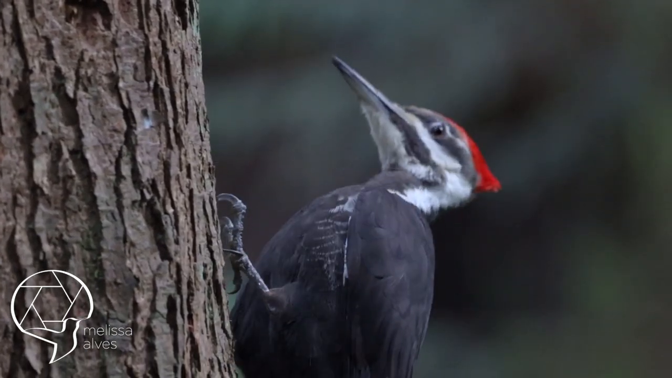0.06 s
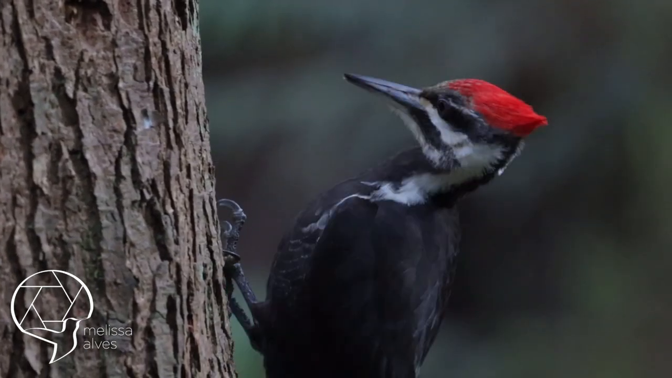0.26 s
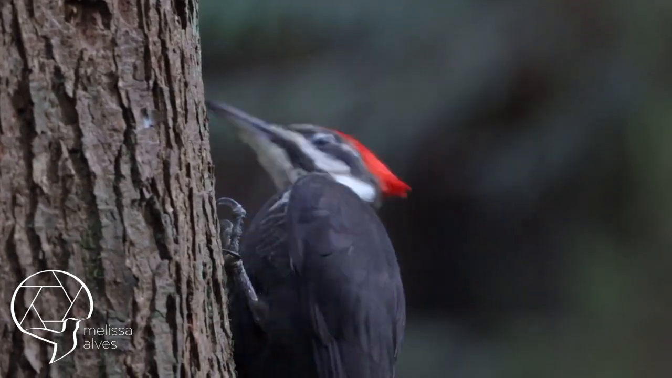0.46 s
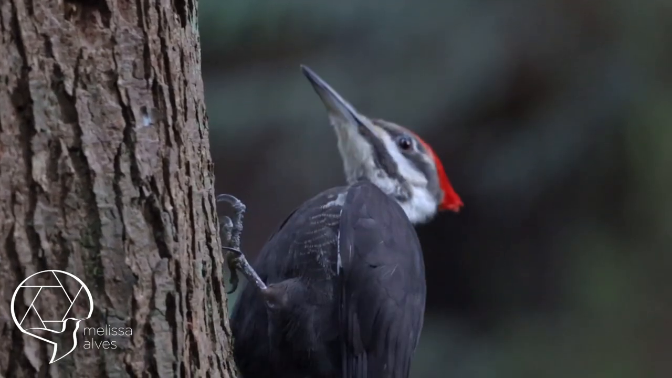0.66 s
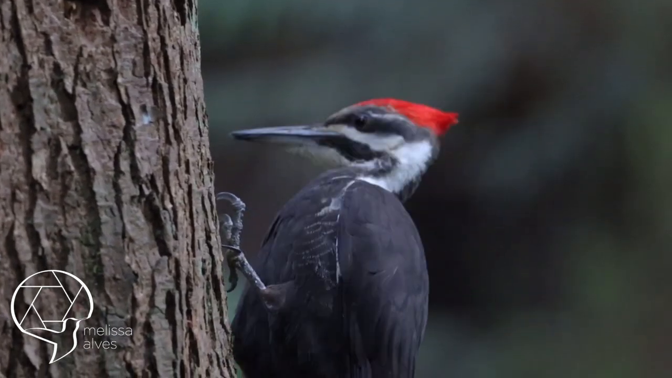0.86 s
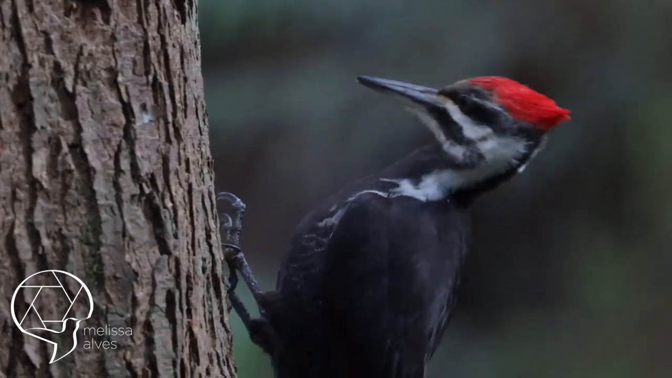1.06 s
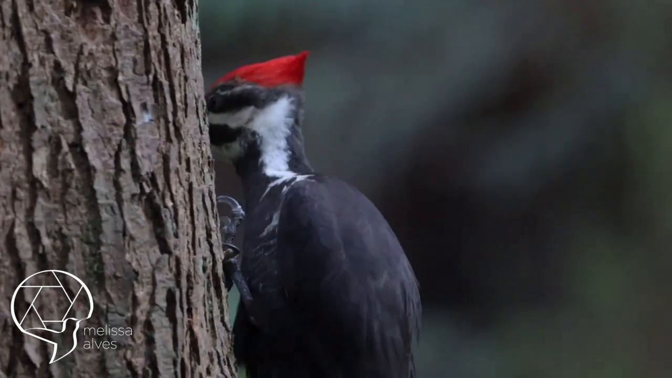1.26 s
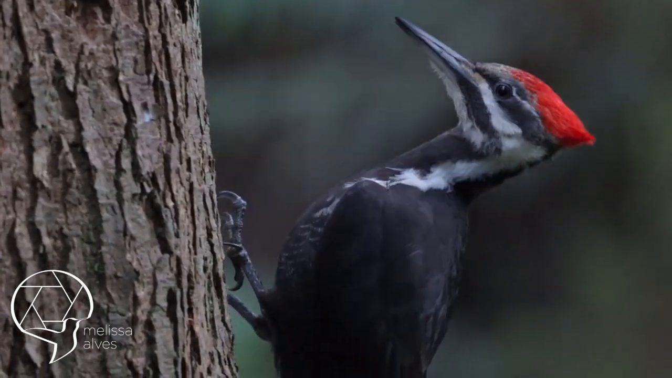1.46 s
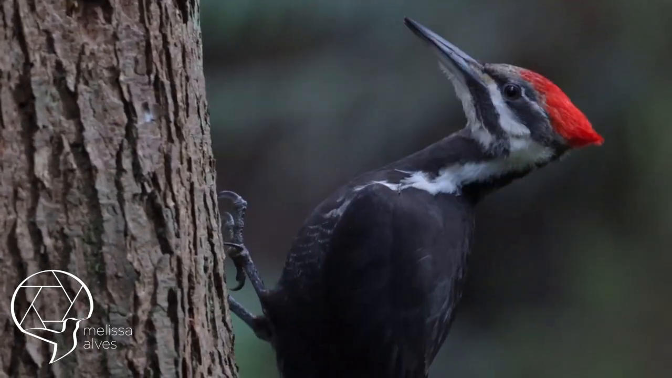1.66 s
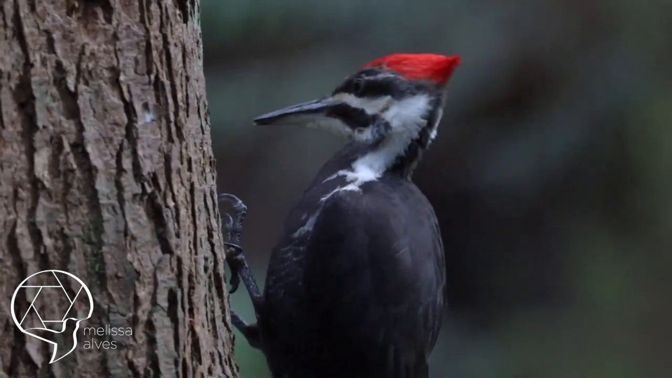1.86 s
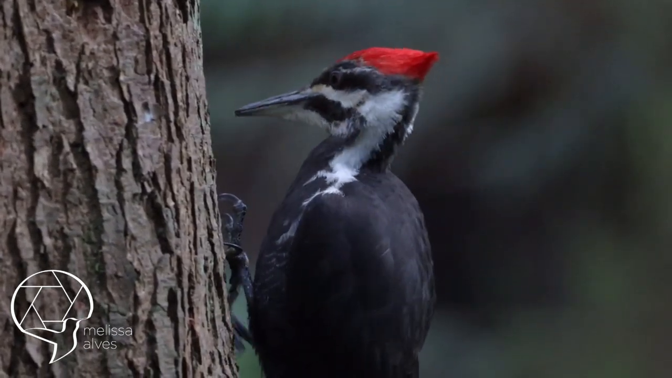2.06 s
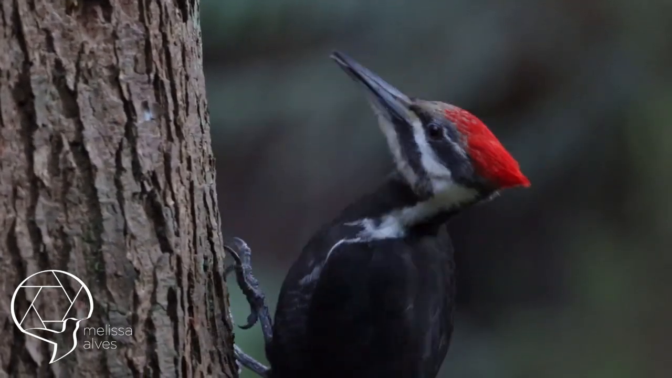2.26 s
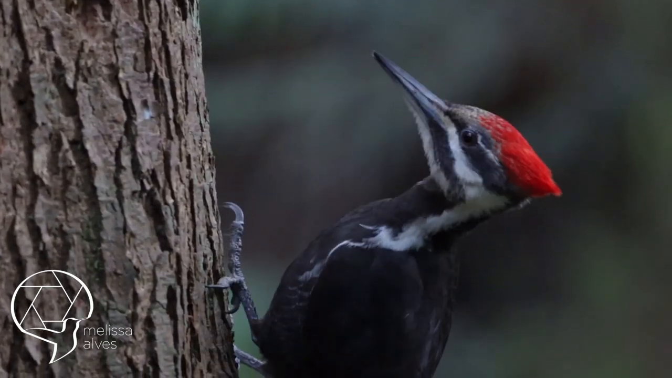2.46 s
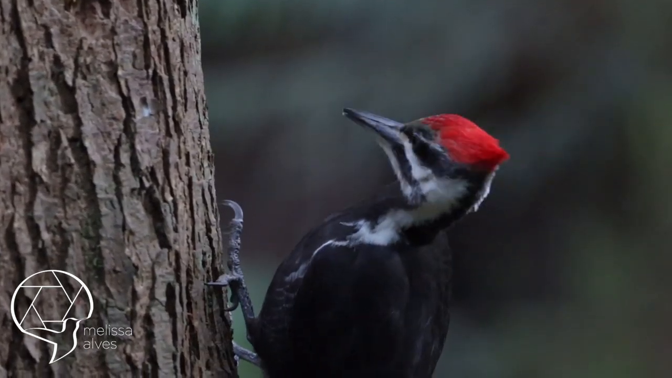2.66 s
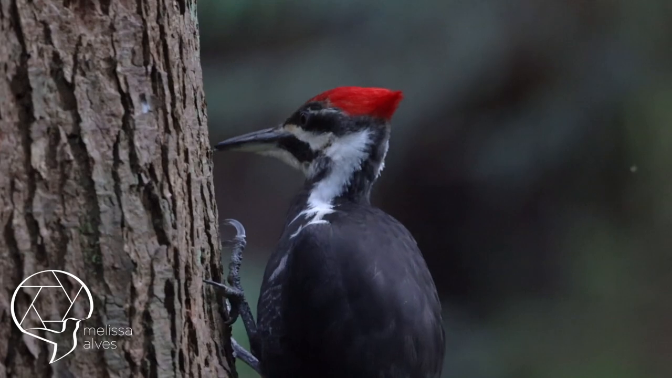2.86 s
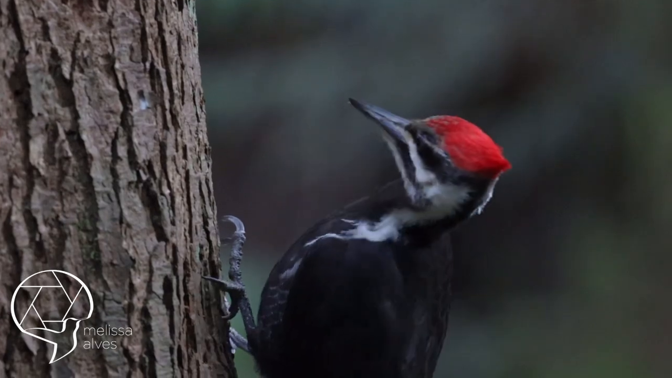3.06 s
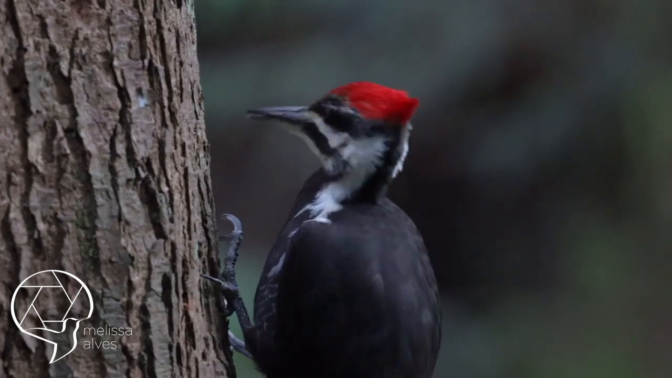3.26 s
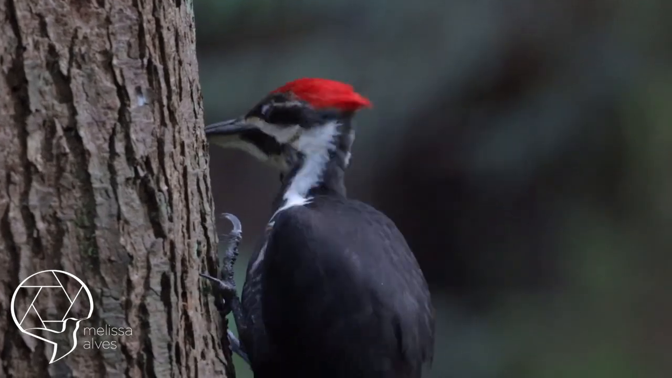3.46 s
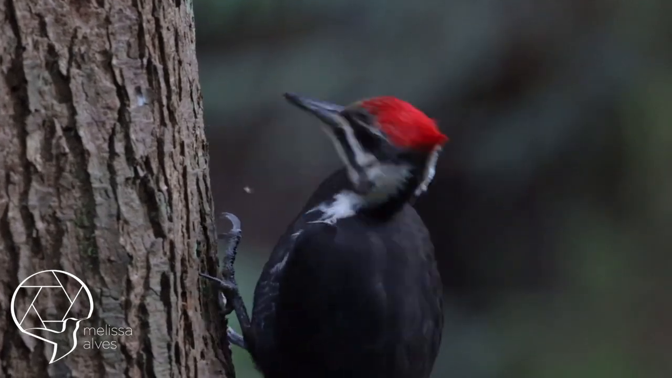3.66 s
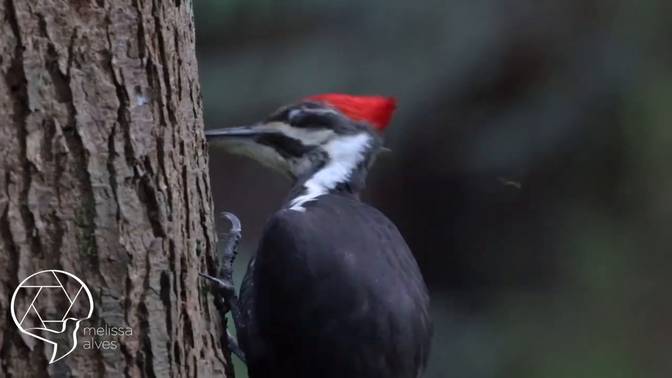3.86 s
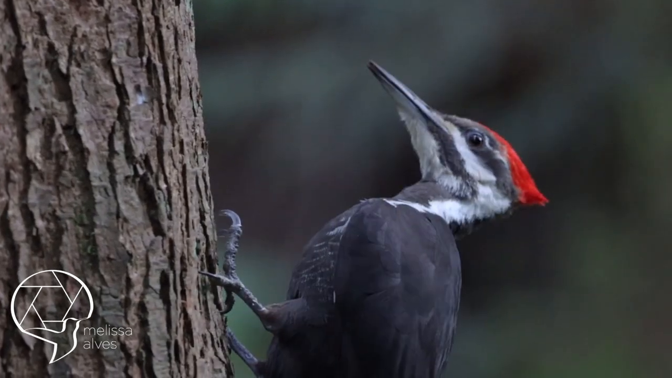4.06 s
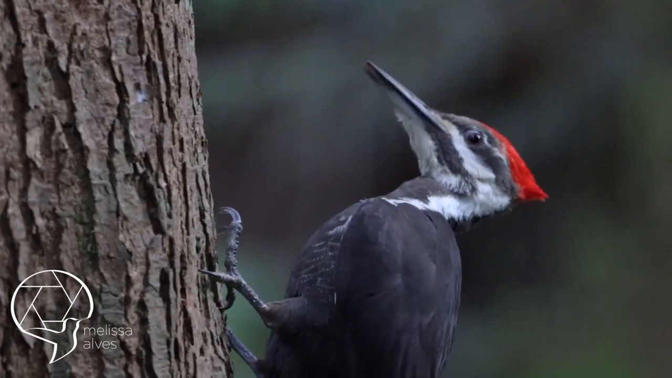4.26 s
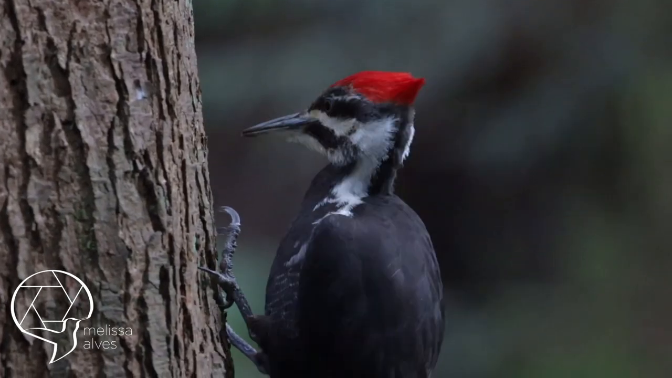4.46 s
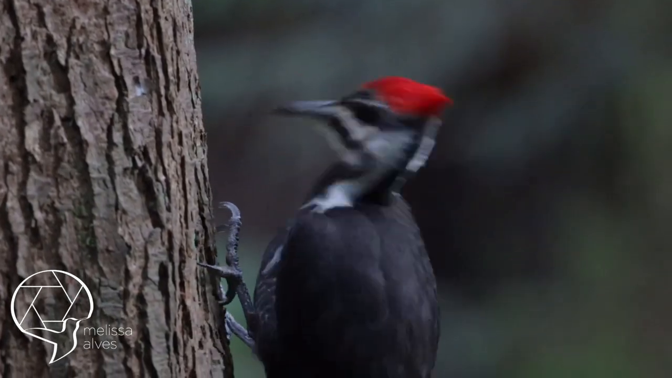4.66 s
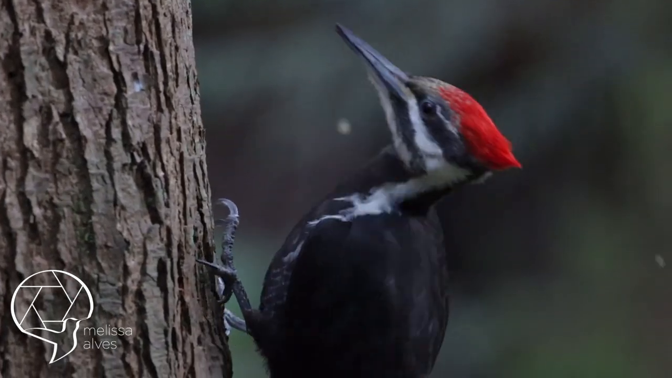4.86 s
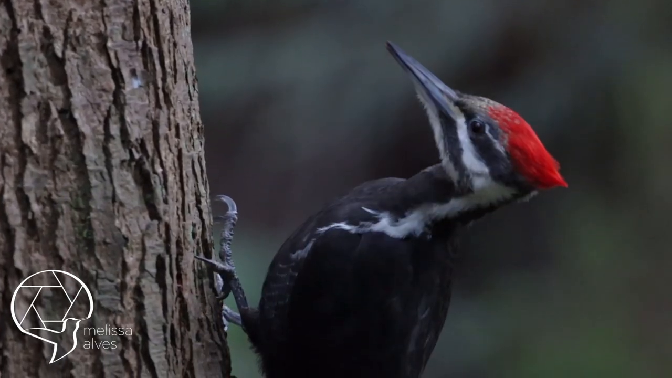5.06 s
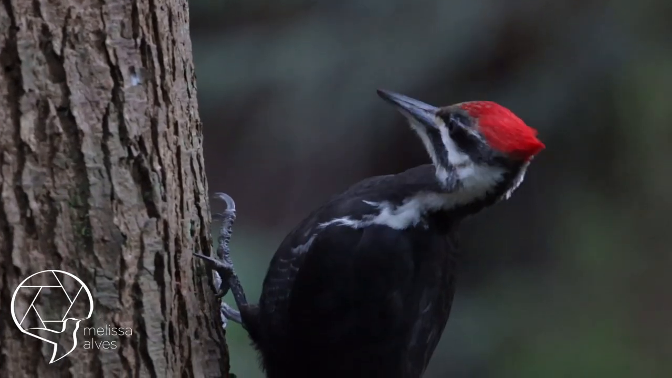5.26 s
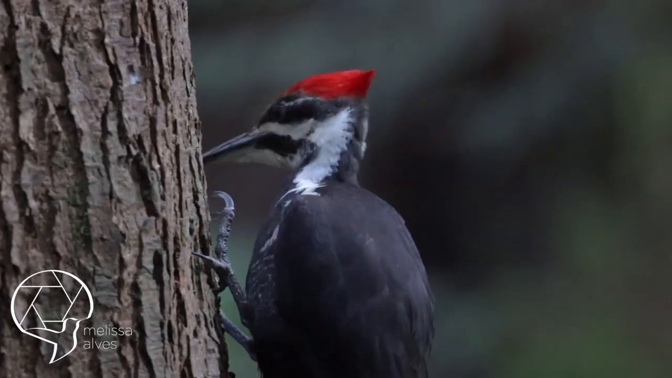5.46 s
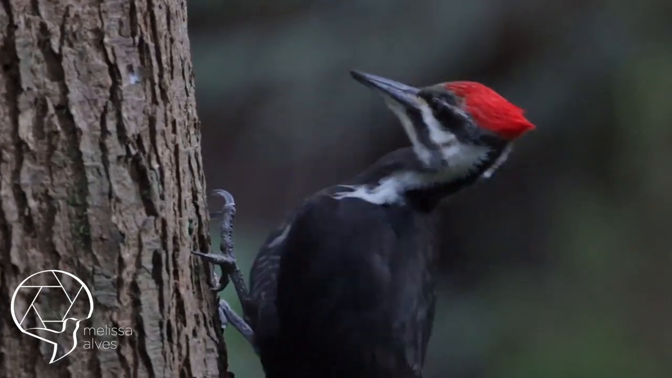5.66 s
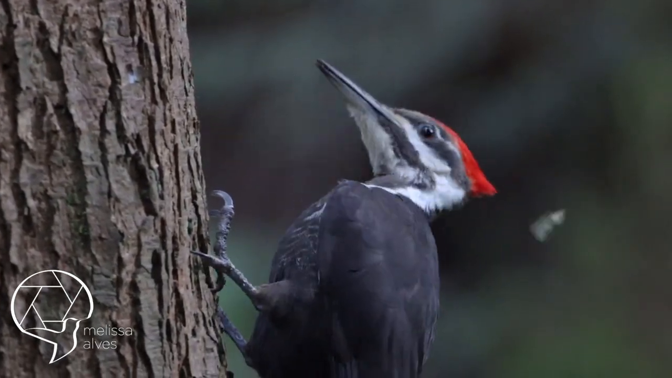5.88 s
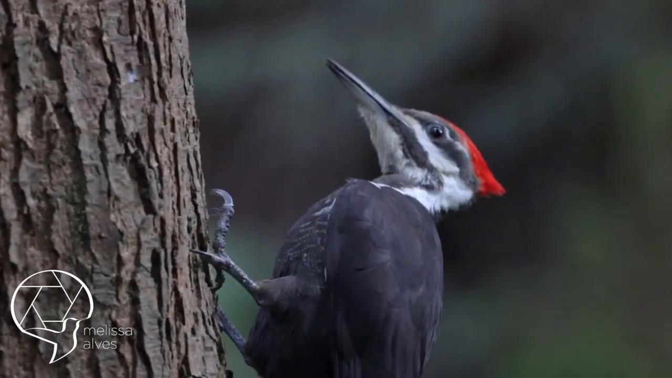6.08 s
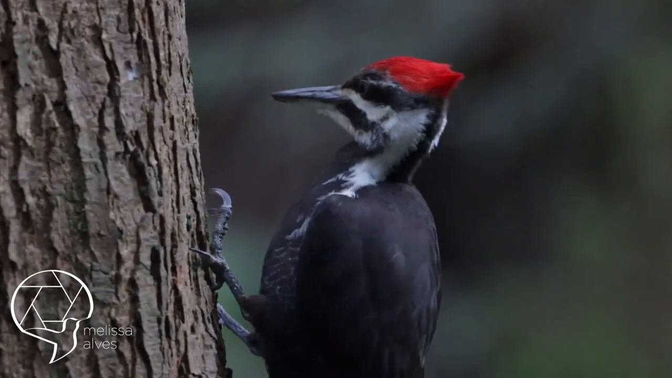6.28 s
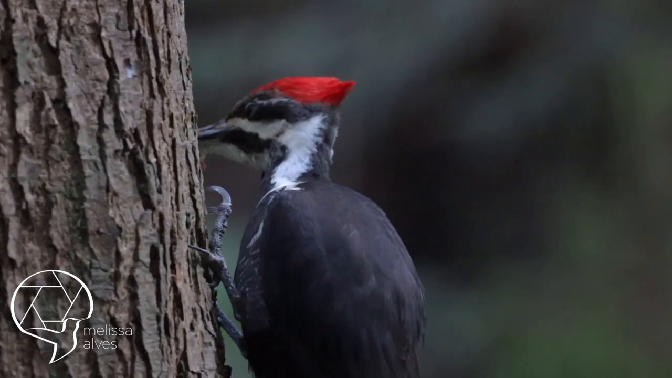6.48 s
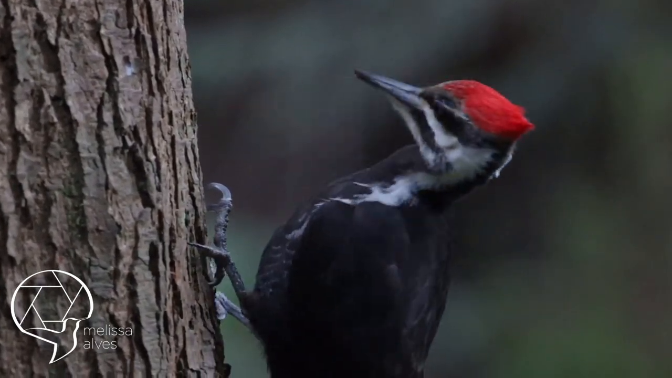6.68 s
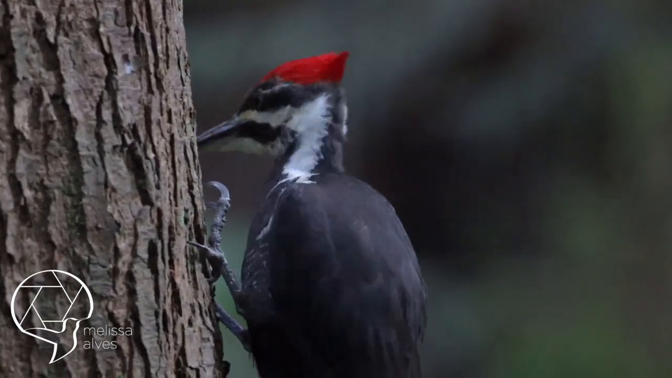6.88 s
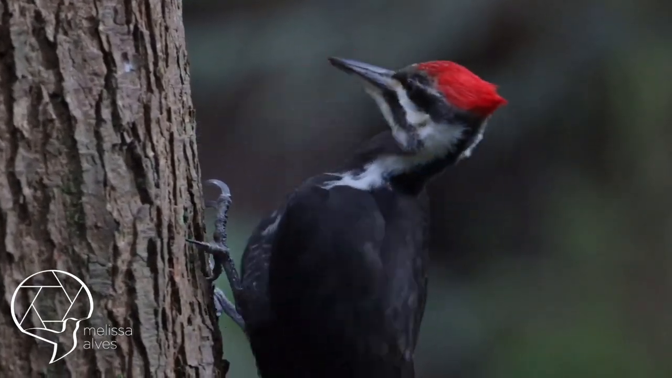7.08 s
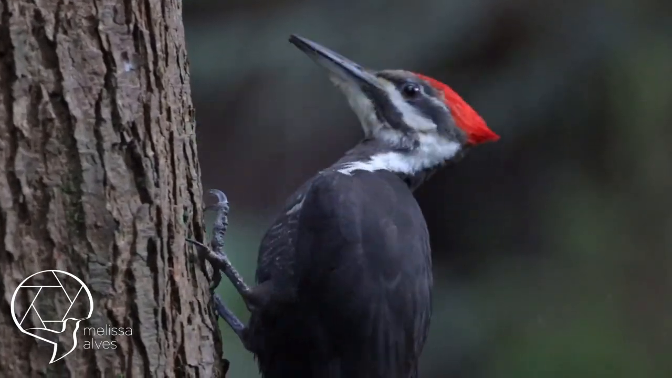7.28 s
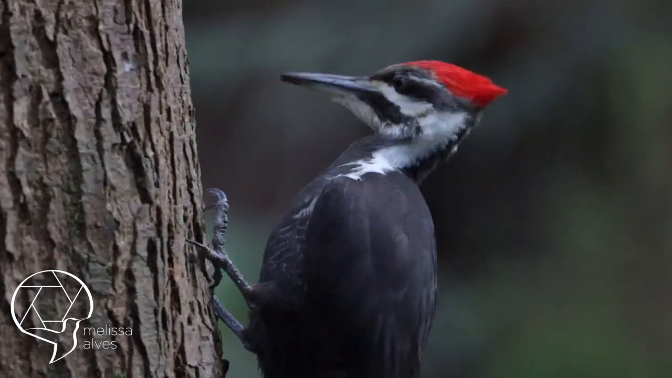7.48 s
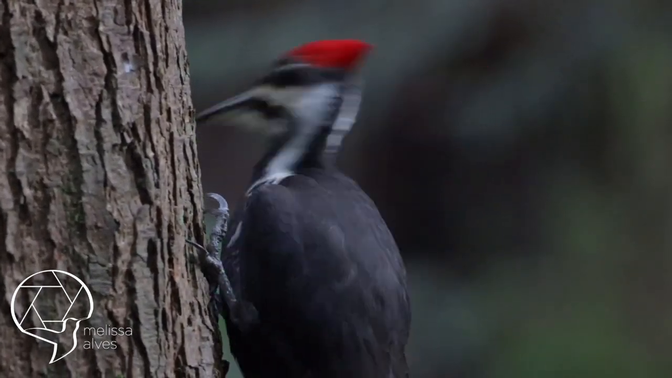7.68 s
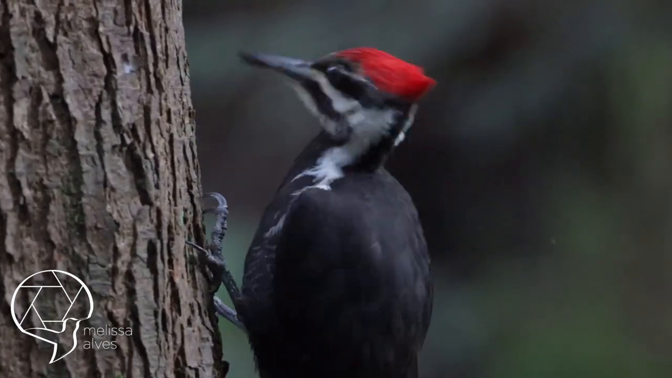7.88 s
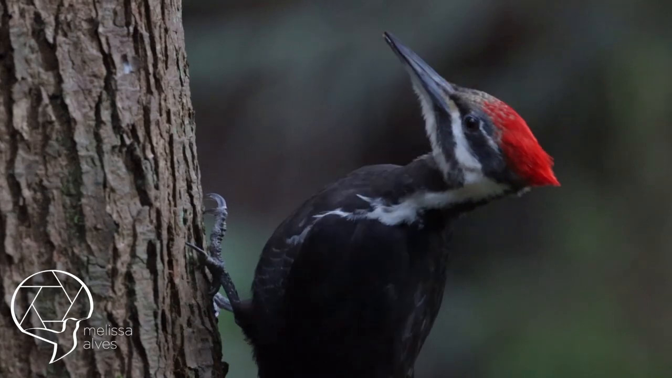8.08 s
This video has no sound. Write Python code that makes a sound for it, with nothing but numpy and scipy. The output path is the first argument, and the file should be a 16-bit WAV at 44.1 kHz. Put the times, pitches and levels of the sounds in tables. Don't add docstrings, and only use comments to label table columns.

```python
import sys
import numpy as np
from scipy import signal
from scipy.fft import rfft, irfft
from scipy.io import wavfile
from scipy.ndimage import uniform_filter1d

SR = 44100
rng = np.random.default_rng(int(sys.argv[2]) if len(sys.argv) > 2 else 0)


def log_audio(samples):
    frames = np.atleast_2d(samples).T
    limited = np.clip(frames, -1, 1)
    pcm = np.round(limited * 32767).astype(np.int16)
    wavfile.write(sys.argv[1], SR, pcm)


def attenuation_scalar(level_db):
    decades = np.asarray(level_db, float) / 20
    return 10 ** decades


N = 358533
SPAN = 8192
WOOD_T60_S = 0.17

# t/s of the main crest, level/dB, f/Hz, left minus right/dB, sway level/dB
THUDS = [(0.4582, -30, 490, -1.5, -39.5), (1.252, -29, 440, -1, -43), (2.8519, -34, 440, -23, -30),
         (3.2223, -37, 437.0, -15, -30), (3.5353, -21, 408, 1.5, -17), (3.921, -24, 401, -14, -21),
         (4.7759, -38, 427, -16, -21), (5.4618, -45.5, 328, 7.5, -17), (5.7992, -21, 433, 1, -24.5),
         (6.531, -20.5, 417, -1, -29), (6.8563, -31.5, 460, 4.5, -13), (7.223, -21, 410, -0.5, -26),
         (7.785, -23.5, 423, 0.5, -10.5)]
# f/pitch, left level/dB, right level/dB, t60/s
TRUNK_MODES = [(1.04, -12, -1.5, .032), (.95, -1.5, -8, .025), (.7, -16, -18, .045)]
# f/pitch, left level/dB, right level/dB, t60/s
WALL_MODE = (1.42, -13, -18, .032)
# delay/ms, level/dB
THUD_ECHOES = [
    (7, -1),
    (16.5, 1),
    (21.5, -6),
]
SWAY_HZ, SWAY_T60_S = 147.6, 0.0477
THUD_ECHO_DB, THUD_ECHO_PER_PAN_DB = -18.5, -0.48


def thuds(out):
    t = np.arange(SPAN) / SR
    for s, db, hz, pan_db, sway_db in THUDS:
        echo_db = THUD_ECHO_DB + THUD_ECHO_PER_PAN_DB * min(pan_db, 0)
        lead = 1.75 / hz
        swell = np.sin(np.pi / 2 * np.minimum(t / (1.5 * lead), 1)) ** 2
        late = np.maximum(t - lead, 0)
        body = np.zeros((2, SPAN))
        for multiple, left_db, right_db, t60 in TRUNK_MODES + [WALL_MODE]:
            decay = attenuation_scalar(np.array([[left_db], [right_db]]) - 60 * late / t60)
            body += decay * np.cos(2 * np.pi * multiple * hz * (t - lead)) * swell
        body /= np.abs(body.mean(axis=0)).max()
        sway_decay = attenuation_scalar(sway_db - 7.5 - 60 * late / SWAY_T60_S)
        body += sway_decay * np.cos(2 * np.pi * SWAY_HZ * (t - lead)) * swell
        add(out, s - lead, attenuation_scalar(db) * sides(pan_db) * body)
        for ms, gain_db in THUD_ECHOES:
            echo = body.mean(axis=0, keepdims=True)
            add(out, s - lead + ms / 1000, attenuation_scalar(db + echo_db + gain_db) * echo)
        tail = ring(scatter(16, .7 * WOOD_T60_S), 1.08 * hz, 420)
        add(out, s, attenuation_scalar(db + echo_db - 2) * unit(tail))


# t/s, peak level/dB, f/Hz, left minus right/dB
BITES = [(0.4575, -49.5, 2210, -16), (1.2484, -36, 2596, -8), (1.2464, -43, 1430, -4),
         (2.383, -60.5, 2544, -9.7), (2.4279, -68, 2492, -12), (2.8481, -37.5, 2070, -6),
         (2.8516, -48.5, 1770, -17), (2.854, -40.5, 2830, -16), (2.852, -35, 2338, -38),
         (3.2191, -29, 2250, -37), (3.5315, -35, 2340, -5), (3.918, -31.5, 2337, -35),
         (3.9216, -46.5, 1444, -14.3), (4.7708, -53, 1470, -6), (4.7734, -27, 2190, -31),
         (4.7736, -40, 2717, -26), (5.4593, -31.5, 2135, -8), (5.461, -42.5, 3080, 11),
         (5.7953, -38.5, 1995, -3.5), (5.8013, -45, 860, 6), (6.5293, -38, 2120, -4.5),
         (6.5316, -42.5, 1486, -4), (6.8523, -37.5, 2266, -6), (7.2205, -38.5, 2340, -7),
         (7.221, -48, 2940, -3), (6.5295, -57, 2970, 0), (5.7943, -59, 2900, 1), (7.2243, -49.5, 1470, 5.5),
         (7.784, -42.5, 2250, -13), (7.786, -49.5, 1404, 0)]
BITE_CYCLES = 7.7
BITE_SCATTER_DB, BITE_SCATTER_PER_PAN_DB = -22.5, -.12
LOW_BITE_SCATTER_DB_PER_OCT = -9
NEXT_TRUNK_MS, NEXT_TRUNK_DB, NEXT_TRUNK_PER_PAN_DB = 32, -33.5, -.4


def bites(out):
    t = np.arange(SPAN) / SR
    for s, db, hz, pan_db in BITES:
        ms = 1000 * BITE_CYCLES / hz
        wet_db = BITE_SCATTER_DB + BITE_SCATTER_PER_PAN_DB * pan_db
        wet_db += LOW_BITE_SCATTER_DB_PER_OCT * np.log2(hz / 2300)
        pure = np.sin(2 * np.pi * (hz * t + rng.random()))
        tone = pure + 1.3 * unit(ring(rng.standard_normal(SPAN), hz, 0.16 * hz))
        add(out, s - .004, attenuation_scalar(db) * sides(pan_db) * unit(tone * contact(ms)))
        back_db = db + NEXT_TRUNK_DB + NEXT_TRUNK_PER_PAN_DB * pan_db
        slap = unit(tone * contact(2.2 * ms, rise=.3))
        add(out, s + NEXT_TRUNK_MS / 1000 - .004, attenuation_scalar(back_db) * sides(-5) * slap)
        tail = unit(ring(scatter(5.4, 1.3 * WOOD_T60_S), hz, 0.34 * hz))
        add(out, s, attenuation_scalar(db + wet_db) * sides(-5.5) * tail)


BESIDE_MS, ALONE_DB, ALONE_LEAN_DB = 3.0, -49.5, -0.5


def lean(s):
    at, db, _, pan_db = np.transpose(BITES)
    weight = attenuation_scalar(db) * np.exp(-((at - s) * 1000 / BESIDE_MS) ** 2)
    return (weight @ pan_db + attenuation_scalar(ALONE_DB) * ALONE_LEAN_DB) / (weight.sum() + attenuation_scalar(ALONE_DB))


# t/s, peak level/dB, lowest f/Hz, middle resonances level/dB, top resonance level/dB
SPLINTERS = [(0.455, -43.5, 4070, 0, -28), (1.2461, -41, 4210, -4, -15), (2.8458, -49, 4530, -4, -17),
             (2.8513, -46.5, 3630, 3, -7), (2.8565, -61, 3540, 3, 5), (2.8622, -58.5, 4220, 6, 1.5),
             (3.2189, -42, 3930, -7.5, -15), (3.221, -54, 3830, -8, -3), (3.2428, -55.5, 4120, 2.5, -2.5),
             (3.531, -56.5, 4150, 1, -14), (3.9174, -47, 4140, -1.5, -4), (4.7723, -47.5, 3800, 1.5, -10),
             (4.7758, -39.5, 4110, -9, -14), (5.46, -46, 4565, 1.5, -11), (5.4604, -44, 4510, -7, -8.5),
             (5.7948, -38.5, 4530, -13, -30), (6.528, -37.5, 4110, -10, -19.5),
             (6.852, -39.5, 4430, -7, -11.5), (7.22, -36, 4100, -9.5, -13.5), (7.7835, -38, 4270, -8.5, -3)]
# t/s, peak level/dB, lowest f/Hz, middle resonances level/dB, top resonance level/dB
TICKS = [
    (0.3417, -81.6, 3740, -1.5, 5.5),
    (2.2946, -65, 3740, -17, -27),
    (2.383, -62.5, 4270, 5, -9),
    (2.412, -57, 4050, -16, -28),
    (2.4271, -52.5, 4800, -5, -9.5),
    (2.818, -57.5, 4010, -16, -33),
    (4.844, -82.5, 3980, -1.5, 26),
    (6.2197, -63.5, 4680, -12, -29),
    (6.866, -68, 4250, -9, 16.5),
]
# width/Hz, rough shoulder width/Hz, shoulder level/dB
GRAIN = [(450, 1167, -6), (600, 1500, 1), (600, 1230, 2), (800, 2070, 3)]
MIDDLE_HZ, THIRD_DB, GRAIN_SCATTER = (6220, 8130), -8.5, .035
TOP_HZ, TOP_HZ_PER_DB, EDGE_HZ, EDGE_HZ_PER_DB = 10370, 53, 14000, 129
SPLINTER_LEFT_DB, SPLINTER_LEAN = 21, 1.07
TEAR_MS, FIBRE_MS, FIBRE_DB, ROUGH_DB, TICK_ROUGH_DB = 2.02, 3.16, -2.5, -8.5, -7
SPLINTER_SCATTER_DB, SPLINTER_SCATTER_PER_PAN_DB = -17.5, -0.38


def splinters(out):
    bright, t = np.zeros_like(out), np.arange(SPAN) / SR
    force = contact(TEAR_MS, rise=0.18, fall=0.85)
    linger = contact(FIBRE_MS, rise=0.15, fall=1.0)
    for row, (s, low_db, low_hz, middle_db, top_db) in enumerate(SPLINTERS + TICKS):
        clean_db = TICK_ROUGH_DB * (row >= len(SPLINTERS))
        levels = low_db + np.array([0, middle_db, middle_db + THIRD_DB, top_db])
        middle_hz = np.array(MIDDLE_HZ) * (1 + GRAIN_SCATTER * rng.standard_normal(2))
        tones = [low_hz, *middle_hz, TOP_HZ + TOP_HZ_PER_DB * top_db]
        edge_hz = EDGE_HZ + EDGE_HZ_PER_DB * top_db
        pan_db = SPLINTER_LEFT_DB + SPLINTER_LEAN * lean(s)
        wet_db = SPLINTER_SCATTER_DB + SPLINTER_SCATTER_PER_PAN_DB * pan_db
        tear, wet = rng.standard_normal(SPAN), scatter(4.7, 1.18 * WOOD_T60_S)
        crack = tail = 0
        for db, hz, (width, broad, shoulder_db) in zip(levels, tones, GRAIN):
            tone = force * np.sin(2 * np.pi * (hz * t + rng.random()))
            apart, phase = rng.random((2, 2, 1))
            fibre_hz = hz + broad * (0.1975 + 0.322 * apart) * [[-1], [1]]
            fibres = linger * np.sin(2 * np.pi * (fibre_hz * t + phase)).sum(axis=0)
            fibres *= attenuation_scalar(shoulder_db + FIBRE_DB + clean_db)
            rough = attenuation_scalar(shoulder_db + ROUGH_DB + clean_db) * unit(band(force * tear, hz, broad))
            crack = crack + attenuation_scalar(db) * unit(tone + fibres + rough)
            returns = ring(wet, hz, width) + attenuation_scalar(shoulder_db - 2) * band(wet, hz, broad)
            tail = tail + attenuation_scalar(db) * unit(returns)
        edge = signal.butter(8, edge_hz, fs=SR, output="sos")
        add(bright, s - .004, sides(pan_db) * signal.sosfilt(edge, crack))
        add(bright, s, attenuation_scalar(wet_db) * sides(16) * signal.sosfilt(edge, tail))
    shade = signal.butter(4, 11500, fs=SR, output="sos")
    bright[1] = signal.sosfiltfilt(shade, bright[1])
    add(out, 0, bright)


# f/Hz, level/dB per Hz
HUSH = [(25, -51), (66, -15), (90, -4.5), (430, -3.5), (1000, 0.5), (2730, -21.5), (13300, -45),
        (14200, -58)]
# f/Hz, left-right correlation/1
LIKENESS = [(60, 0.99), (130, 0.97), (280, 0.91), (600, 0.59), (1280, 0.19), (2750, -0.0), (5910, 0.23),
            (12700, 0.01)]
# f/Hz, left minus right/dB
PORTS = [(60, 1.5), (110, -1), (200, 1), (360, -1.0), (650, -1), (1180, -2.5), (2130, -3), (3870, 1.5),
         (7010, 4), (12700, 0.5)]
HUSH_DB = -64.6


def hush():
    hz = np.arange(N // 2 + 1) * SR / N
    like = np.clip(on_log(hz, LIKENESS), 0, .99)
    mid, side = (rfft(rng.standard_normal(N)) * attenuation_scalar(on_log(hz, HUSH)) for _ in range(2))
    pair = np.array([np.sqrt(1 + like) * mid + k * np.sqrt(1 - like) * side for k in (1, -1)])
    pair *= attenuation_scalar(np.array([[.5], [-.5]]) * on_log(hz, PORTS))
    octave, out, swell = np.log2(hz + 1), 0, walk(1.24)
    for centre in np.arange(4, 15):
        octave_band = irfft(pair * np.clip(1 - np.abs(octave - centre), 0, 1), N)
        out = out + octave_band * attenuation_scalar(.3 * swell + 1.1 * walk(6))
    core = irfft(pair.mean(axis=0) * (hz > 500) * (hz < 1500), N)
    return out / core.std() * attenuation_scalar(HUSH_DB)


def contact(ms, rise=0.26, fall=0.59):
    t = np.arange(SPAN) / SR * 1000 - 4
    dig_in = np.exp(-(t / (rise * ms)) ** 2)
    let_go = np.exp(-(np.abs(t) / (fall * ms)) ** 1.4)
    return np.where(t < 0, dig_in, let_go)


def scatter(start_ms, t60):
    t = np.arange(SPAN) / SR
    onset = 1 - np.exp(-(t * 1000 / start_ms) ** 2)
    return rng.standard_normal((2, SPAN)) * onset * attenuation_scalar(-60 * t / t60)


def ring(x, hz, width):
    b, a = signal.iirpeak(hz, hz / width, SR)
    return signal.lfilter(b, a, signal.lfilter(b, a, x))


def band(x, hz, width):
    edges = np.clip([hz - width / 2, hz + width / 2], 200, 18000)
    return signal.sosfilt(signal.butter(3, edges, "bandpass", fs=SR, output="sos"), x)


def walk(rate):
    k = int(SR / rate)
    steps = np.repeat(rng.standard_normal(N // k + 1), k)
    return 1.273 * uniform_filter1d(uniform_filter1d(steps, k), k)[:N]


def on_log(hz, table):
    points = np.array(table)
    return np.interp(np.log(hz + 1), np.log(points[:, 0]), points[:, 1])


def unit(x):
    return x / np.abs(x).max()


def sides(pan_db):
    return np.array([[attenuation_scalar(pan_db)], [1]]) * 2 / (1 + attenuation_scalar(pan_db))


def add(out, s, x):
    i = int(s * SR)
    out[:, i:i + x.shape[1]] += x[:, :N - i]


def scene():
    knocks = np.zeros((2, N))
    for source in (thuds, bites, splinters):
        source(knocks)
    bass_cut = signal.butter(2, 70, "highpass", fs=SR, output="sos")
    return hush() + signal.sosfilt(bass_cut, knocks)


def band_limit(x):
    return signal.sosfilt(signal.butter(12, 15600, fs=SR, output="sos"), x)


def record(dry):
    return band_limit(dry)


dry = scene()
out = record(dry)
log_audio(out)
```